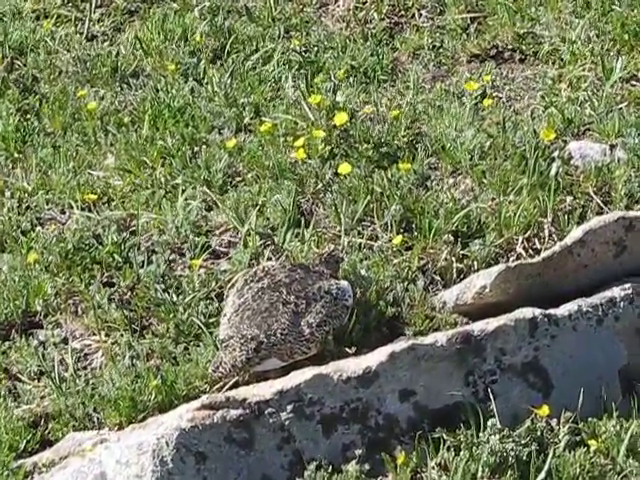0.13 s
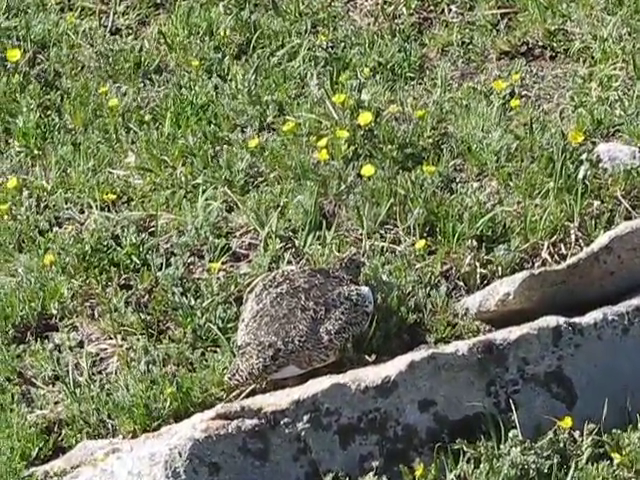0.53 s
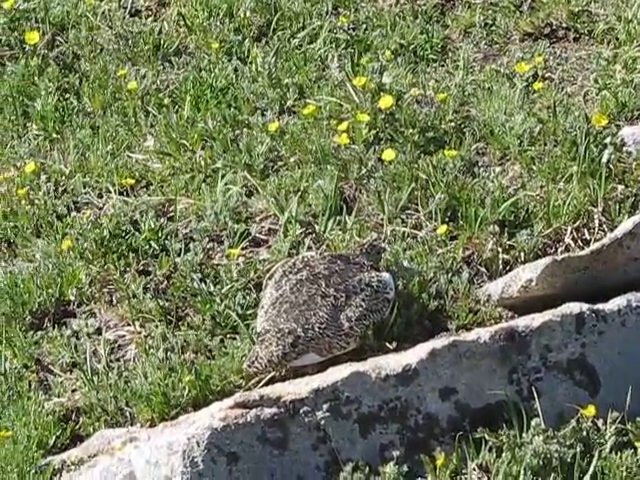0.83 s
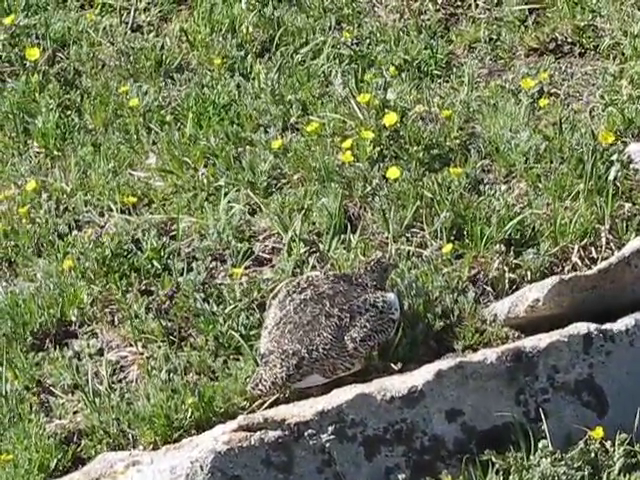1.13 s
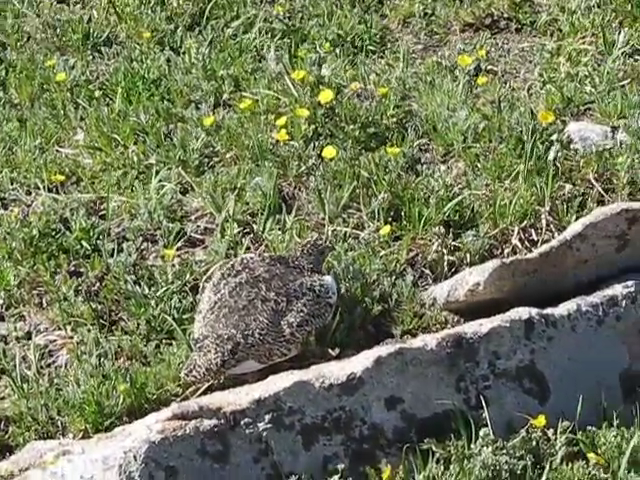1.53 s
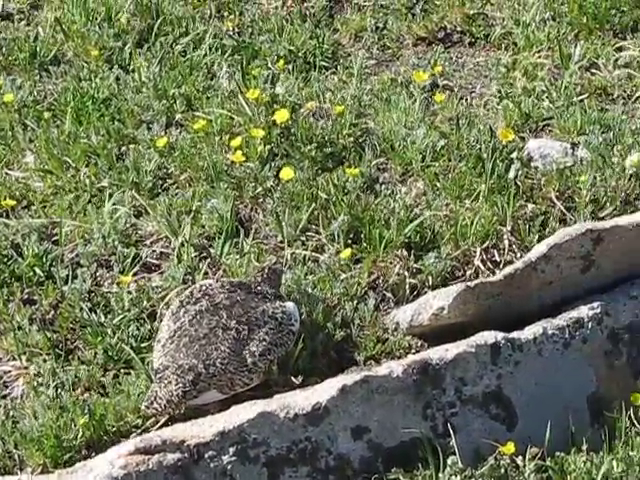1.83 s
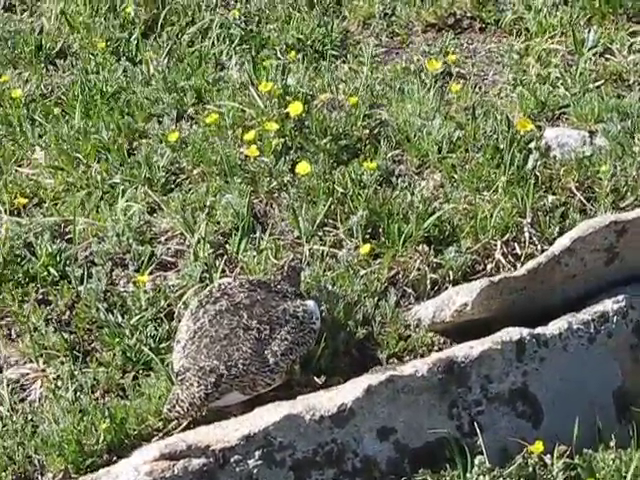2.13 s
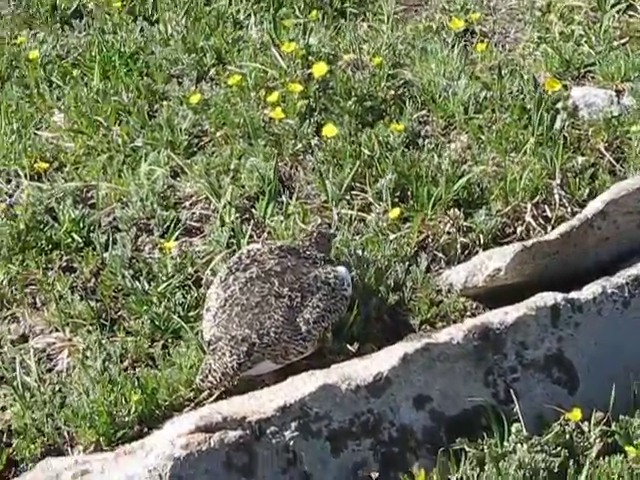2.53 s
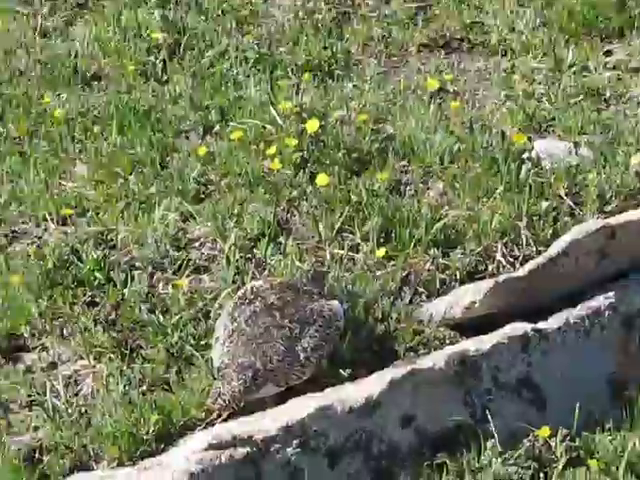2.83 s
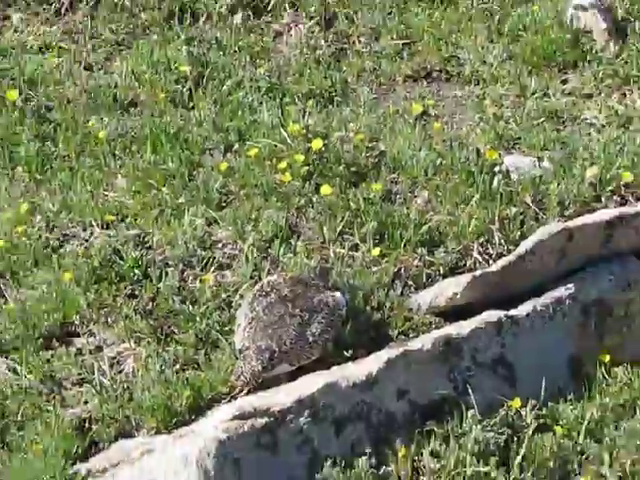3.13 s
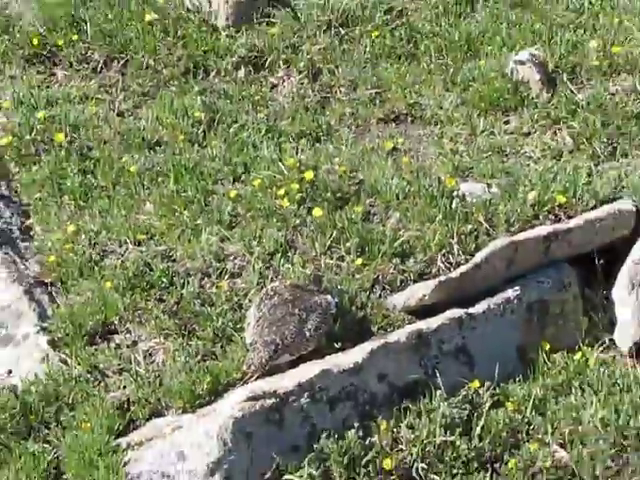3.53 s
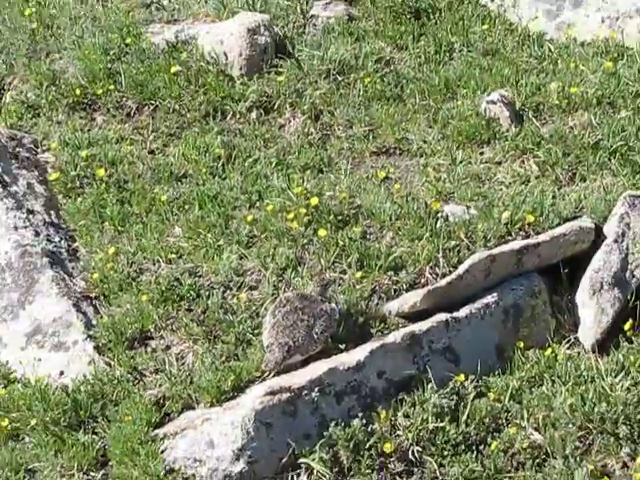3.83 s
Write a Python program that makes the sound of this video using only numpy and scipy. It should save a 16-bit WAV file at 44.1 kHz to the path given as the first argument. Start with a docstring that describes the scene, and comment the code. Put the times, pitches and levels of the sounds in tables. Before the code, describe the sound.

Ground bird croaks roughly twice, with three thin chick peeps and wind buffeting the microphone.

```python
"""Ptarmigan croaks on open tundra

A ptarmigan gives two short croaks: a harmonic series whose pitch and level pulse about sixty times a second.
Three thin rising peeps, probably a chick's, are gliding sines that crack near the end.
Gusts rumble on the microphone as filtered noise; struck modes make soft ticks and the click that ends
the first croak, and short noise bursts make snaps and a rustle.
Behind lie a steady noise hiss and the camera's faint pulsing sine whine."""
import sys
import numpy as np
from scipy import signal
from scipy.io import wavfile
from scipy.ndimage import uniform_filter1d

SR = 44100
rng = np.random.default_rng(int(sys.argv[2]) if len(sys.argv) > 2 else 0)


def dump(signal):
    """Clip the signal to [-1, 1] and save it as 16-bit WAV at the path in sys.argv[1]."""
    limited = np.clip(np.atleast_2d(signal).T, -1, 1)
    pcm = np.round(limited * 32767).astype(np.int16)
    wavfile.write(sys.argv[1], SR, pcm)


N = 176400
T = np.arange(N) / SR  # time [s]
CUTOFF_HZ = 15750

# Beating of each croak: (first beat [s], beat rate [1/s], slowing [1/s^2])
CROAK_BEATS = [(1.586, 61.9, 18), (3.7455, 62.4, 0)]
# Rise of pitch between beats, one value per croak: (leap [octaves])
CROAK_LEAPS = [.7, 0.61]
# Course of each croak: (time [s], pitch on the beat [Hz], level before the throat [dB])
CROAK_COURSES = [
    [(1.57, 705, -56), (1.603, 743, -40), (1.63, 846, -34), (1.70, 832, -33), (1.785, 766, -34.5),
     (1.805, 720, -37.5), (1.823, 666, -43.5), (1.845, 600, -62)],
    [(3.725, 749, -60), (3.745, 747, -42.5), (3.775, 760, -32.5), (3.81, 755, -31.5), (3.845, 813, -31),
     (3.92, 851, -26.5), (3.955, 798, -30.5), (4.0, 841, -31.5)],
]
# Resonance of throat and beak in each croak: (frequency [Hz], gain [dB])
THROAT_RESPONSES = [
    [(600, -3), (850, -4), (1250, 5), (1650, -4), (2100, -3), (2500, -0.5), (3200, -11.5), (3700, -24),
     (4200, -17), (5000, -29), (8000, -38), (14000, -36)],
    [(600, -8.5), (850, -5), (1200, 9), (1500, 1.5), (2000, 0), (2400, -2), (2900, -21), (3700, -26.5),
     (4350, -19.5), (5200, -36.5), (8000, -45), (14000, -43)],
]
# Beats that half fail: (time [s], level loss [dB], pitch rise [octaves])
WEAK_BEATS = [(1.685, 2.5, .12), (1.716, 2.5, 0.11), (3.824, 4, 0.072), (3.889, 9, 0.084),
              (3.969, 4.5, 0.053)]
# Stereo placing of the croaks: (frequency [Hz], left-right difference [dB])
CROAK_PAN = [(900, 1), (1600, -2.9), (2400, -5), (4500, -2)]
# Course of each peep: (time [s], pitch [Hz], level [dB])
PEEP_COURSES = [
    [(0.095, 3650, -67), (0.101, 4060, -45), (0.125, 4480, -32), (0.135, 5270, -29.5), (0.143, 5920, -42.5),
     (0.148, 5870, -54)],
    [(1.417, 3870, -53), (1.427, 4240, -38.5), (1.443, 4150, -41), (1.451, 4430, -29.5), (1.463, 5110, -30),
     (1.472, 5220, -51.5)],
    [(2.857, 3662, -53), (2.865, 3950, -37.5), (2.873, 4170, -39), (2.883, 4280, -30), (2.895, 4900, -25),
     (2.905, 5700, -30.5), (2.911, 5762, -48)],
]
# Soft ticks, and the low click that ends the first croak (1.81 s):
# (time [s], strength before the modes [dB], left-right difference [dB])
TICK_STRIKES = [(0.065, -45, 1), (0.132, -38.5, 3.5), (0.249, -47, 0), (0.814, -45, -4), (0.864, -51, -1.0),
                (0.907, -47, -1.0), (0.94, -43, -1), (0.974, -40, 1), (1.008, -39.5, -1.0), (1.035, -42, 3),
                (1.059, -42, 1), (1.1, -43, -0.5), (1.121, -40, 2), (1.153, -46, 4), (1.343, -40.5, -0.5),
                (1.369, -39.5, -3), (1.434, -40, 10), (1.81, -28.5, -2.5), (1.932, -41.5, 2),
                (1.995, -44, -2), (2.227, -46, -1.5), (2.454, -46, 15.5), (2.569, -42, 7), (2.592, -43, 4),
                (2.616, -52, 4), (2.659, -44.5, 1.5), (2.683, -37.5, 17), (2.771, -44.5, 13),
                (3.238, -43.5, 3)]
# Damped modes of the ticks: (frequency [Hz], relative gain [dB], time to fall 60 dB [s])
TICK_MODES = [(480, 2.5, 0.034), (760, 9, 0.013), (977, 9, 0.014), (1255, 10.5, 0.01), (1810, -9, 0.013),
              (2300, -15, 0.0073)]
# Strength of the finer patter, before the modes: (time [s], level [dB])
PATTER_LEVEL = [(0, -58.5), (.75, -55.5), (.9, -50), (1.15, -53), (1.42, -49), (1.55, -54), (2.45, -63),
                (2.66, -50), (2.85, -59), (3.2, -56), (3.45, -59.5), (4, -55)]
# Crisp snaps of dry stems: (time [s], strength before the noise [dB], left-right difference [dB])
STEM_SNAPS = [(.067, -44, -7), (.134, -41.5, -3), (.19, -50, -2), (.755, -62, 0), (1.298, -63, 3),
              (2.57, -40, -15)]
# Relative spectrum of the snaps: (frequency [Hz], density [dB per Hz])
SNAP_SPECTRUM = [(1000, -20), (3200, 8), (4500, 1), (7000, -13), (15000, -21)]
# Course of the brushing rustle, before its flicker: (time [s], level [dB])
RUSTLE_LEVEL = [(1.17, -77), (1.22, -49.5), (1.275, -51.5), (1.30, -41.5), (1.315, -50), (1.37, -54),
                (1.45, -75)]
# Relative spectrum of the rustle: (frequency [Hz], density [dB per Hz])
RUSTLE_SPECTRUM = [(300, 18.5), (1400, 8.5), (2500, 2), (5000, -2), (8000, -9), (13500, -1), (15500, -21)]
# Gusts on each microphone port, before flicker and brightening: (time [s], level [dB])
GUSTS_LEFT = [(0.0, -12), (0.12, -17.5), (0.18, -18.5), (0.23, -15.5), (0.38, -31), (0.67, -42.5),
              (0.8, -23), (0.94, -17), (0.98, -26.5), (1.12, -28), (1.28, -45.5), (1.45, -37), (1.49, -27),
              (1.59, -21.5), (1.93, -39), (1.99, -29), (2.09, -33.5), (2.32, -31.5), (2.38, -53),
              (2.42, -36), (2.48, -63), (3.09, -77), (3.53, -60), (3.71, -61), (3.77, -42.5), (4.0, -43.5)]
GUSTS_RIGHT = [(0.0, -14), (0.43, -33), (0.51, -26), (0.68, -37.5), (0.73, -22.5), (0.82, -27), (0.88, -17),
               (1.05, -32.5), (1.09, -22.5), (1.38, -26.5), (1.45, -4.5), (1.51, -20), (1.85, -25),
               (1.91, -22), (2.04, -32.5), (2.07, -17.5), (2.21, -22), (2.26, -37.5), (2.45, -45.5),
               (2.49, -58), (2.88, -91), (3.31, -52), (3.42, -42), (3.74, -50.5), (3.85, -40), (4.0, -54)]
# Relative rumble spectrum of each port at the reference gust: (frequency [Hz], density [dB per Hz])
RUMBLE_LEFT = [(20, -13.5), (35, -5.5), (65, 2), (120, 1), (170, -5), (250, -12), (380, -26.5), (600, -49),
               (1200, -69)]
RUMBLE_RIGHT = [(20, -5.5), (35, -1), (65, 2), (120, -0.5), (170, -13.5), (250, -35.5), (400, -47),
                (700, -67), (1200, -57)]
# Relative spectrum of the distant air: (frequency [Hz], density [dB per Hz])
AIR_SPECTRUM = [(50, 3.5), (120, 2), (300, -1.5), (700, -2.5), (1230, -5), (1700, -4.5), (2500, -7.5),
                (4500, -10), (8000, -14.5), (11000, -15.5), (15500, -24.5)]
# Course of the distant air: (time [s], level [dB])
AIR_LEVEL = [(0, -54.5), (.5, -55), (1.0, -52.5), (2.3, -53), (3.1, -52), (4.0, -52.5)]
# Likeness of the two channels of air: (frequency [Hz], left-right correlation [-1 to 1])
AIR_CORRELATION = [(100, 0.62), (400, 0.78), (1200, 0.23), (3000, 0.13), (7000, 0.073), (15000, 0.07)]
# Stereo placing of the air: (frequency [Hz], left-right difference [dB])
AIR_PAN = [(200, -1), (1200, -1), (4500, -1.6), (12000, 1)]

# Croak: irregularity as relative pitch, overtone level [dB] and relative amplitude
PITCH_JITTER, SHIMMER_DB, RASP = .022, 1.1, .1
BEAT_JITTER_S, WEAK_WIDTH_S = .0003, .006
# The pitch is lowest at this place in the beat, then leaps for a share of it
LOWEST_AT_BEATS, LEAP_SHARE, SLIDE_CURVE = .2, 0.28, 1.7
FUNDAMENTAL_LEAD_BEATS, SECOND_LAG_BEATS = 0.063, 0.048
FUNDAMENTAL_DIP_DB, OVERTONE_DIP_DB, SWELL_SHAPE = 12.5, 18, 1.27
# Below this course level the upper overtones weaken, in dB per dB
SOFT_BELOW_DB, SOFT_DULLING = -30.5, 0.64

PEEP_FADE_S, PEEP_OCTAVE_DB = 0.0082, -25
PEEP_PAN_DB, PEEP_RIGHT_LAG_S = 5.5, .000044
# Near the top the voice breaks; depth scales the random phase [rad] and relative amplitude
CRACK_BEFORE_END_S, CRACK_WIDTH_S, CRACK_DEPTH, CRACK_RATE_HZ = 0.0043, 0.0056, 0.48, 1000

TICK_DB, TICK_SPREAD_DB, PATTER_PER_S = -9, 3, 130
SNAP_DECAY_S = 0.0028  # time constant
RUSTLE_PAN_DB = 0.5
# Brightening is in dB per octave for each dB above the reference gust
WIND_REFERENCE_DB, WIND_BRIGHTENING, WIND_FLICKER_DB, WIND_DB = -14.5, 0.41, 3, 1
WHINE_HZ, WHINE_DB, WHINE_RIGHT_DB = 7868, -57.5, -15.5  # right is relative to left
WHINE_PERIOD_S, WHINE_CENTRE_S, WHINE_DUTY = 1 / 29.97, 3.031, 0.5


def croak(beating, leap_octaves, course, throat):
    """Resonance shapes a harmonic series whose pitch and overtone levels are modulated at the beat rate."""
    first_s, rate, slowing = beating
    beat_hz, level_db = in_time(course)
    gate = during(course, .005)
    on = gate > 0
    since = T - first_s + BEAT_JITTER_S * drift(19.2)
    beats = since * (rate - slowing * since / 2)
    octaves = leap_octaves * (pitch_lift(beats) - pitch_lift(0))
    for s, loss_db, weak_octaves in WEAK_BEATS:
        near = np.exp(-((T - s) / WEAK_WIDTH_S) ** 2)
        level_db = level_db - loss_db * near
        octaves = octaves + weak_octaves * near
    hz = (beat_hz * 2 ** octaves * (1 + PITCH_JITTER * drift(270)))[on]
    phase = 2 * np.pi * np.cumsum(hz) / SR
    softness_db = np.maximum(SOFT_BELOW_DB - level_db[on], 0)
    out = np.zeros((2, N))
    for k in range(1, 16):
        dip_db = FUNDAMENTAL_DIP_DB if k == 1 else OVERTONE_DIP_DB
        lead = {1: FUNDAMENTAL_LEAD_BEATS, 2: -SECOND_LAG_BEATS}.get(k, 0)
        # 0 on the beat, 1 midway between beats
        slack = np.abs(np.sin(np.pi * (beats[on] + lead))) ** (2 * SWELL_SHAPE)
        dull_db = SOFT_DULLING * softness_db * (k > 2)
        gain_db = at_hz(throat, k * hz) - dip_db * slack - dull_db + SHIMMER_DB * drift(220)[on]
        harmonic = np.sqrt(2) * from_db(gain_db) * np.sin(k * phase)
        out[:, on] += harmonic * panned(at_hz(CROAK_PAN, k * hz))
    return out * gate * from_db(level_db) * (1 + RASP * drift(620))


def pitch_lift(beats):
    """Frequency modulation, 0 to 1 over each beat: a quick leap, then a flattening slide."""
    after = (beats - LOWEST_AT_BEATS) % 1
    leap = np.sin(np.pi / 2 * after / LEAP_SHARE) ** 2
    slide = ((1 - after) / (1 - LEAP_SHARE)) ** SLIDE_CURVE
    return np.where(after < LEAP_SHARE, leap, slide)


def peep(course):
    """A gliding sine with a weak octave; random phase and amplitude modulation cracks it near the end."""
    hz, level_db = in_time(course)
    crack_s = course[-1][0] - CRACK_BEFORE_END_S
    crack = CRACK_DEPTH * np.exp(-((T - crack_s) / CRACK_WIDTH_S) ** 2)
    # A later arrival at the right sets the whistle to the left
    cycles = np.cumsum(hz) / SR - hz * np.array([[0], [PEEP_RIGHT_LAG_S]])
    phase = 2 * np.pi * cycles + crack * drift(CRACK_RATE_HZ)
    tone = np.sin(phase) + from_db(PEEP_OCTAVE_DB) * np.sin(2 * phase)
    tone = tone * (1 + crack * drift(CRACK_RATE_HZ)) * during(course, PEEP_FADE_S)
    tone = band_passed(tone, 4, [3200, 8300])
    return np.sqrt(2) * tone * from_db(level_db) * panned(PEEP_PAN_DB)


def ticks():
    """Modal synthesis: knocks, a croak's closing click and a finer patter excite well-damped modes."""
    patter = (rng.random(N) < PATTER_PER_S / SR) * from_db(in_time(PATTER_LEVEL)[0])
    strikes = kicks(TICK_STRIKES) + patter
    out = 0
    for hz, db, t60 in TICK_MODES:
        r = from_db(-60 / (t60 * SR))  # decay per sample
        w = 2 * np.pi * hz / SR
        strength = from_db(TICK_DB + db + TICK_SPREAD_DB * rng.standard_normal(N))
        strength = strength * rng.choice([-1, 1], N)
        mode = [1, -r * np.cos(w)], [1, -2 * r * np.cos(w), r * r]
        out = out + signal.lfilter(*mode, strikes * strength)
    return band_passed(out, 2, [250, 2600])


def snaps():
    """Exponential decay: bright noise bursts die within milliseconds."""
    decay = signal.lfilter([1], [1, -np.exp(-1 / (SNAP_DECAY_S * SR))], kicks(STEM_SNAPS))
    return decay * noise(SNAP_SPECTRUM, alike=0.24)


def rustle():
    """Random amplitude modulation of coloured noise, as something brushes briefly near the microphone."""
    level_db = in_time(RUSTLE_LEVEL)[0] + 2.2 * drift(56)
    envelope = from_db(level_db) * during(RUSTLE_LEVEL, .02)
    return envelope * noise(RUSTLE_SPECTRUM, alike=0.9) * panned(RUSTLE_PAN_DB)


def wind(gusts, spectrum):
    """Low-frequency noise on one microphone port, its spectrum tilting brighter as the gust grows."""
    level_db = in_time(gusts)[0] + WIND_FLICKER_DB * drift(19.3)
    force_db = level_db - WIND_REFERENCE_DB
    out = 0
    for hz, band in zip(*noise_bands(spectrum, [(1, 0.11)])):
        tilt_db = force_db * WIND_BRIGHTENING * np.log2(hz / 80)
        out = out + band[0] * from_db(WIND_DB + level_db + tilt_db)  # one channel per port
    return out


def air():
    """A diffuse field: steady hiss whose left-right correlation depends on frequency."""
    centres, bands = noise_bands(AIR_SPECTRUM, AIR_CORRELATION)
    hiss = sum(band * panned(at_hz(AIR_PAN, hz)) for hz, band in zip(centres, bands))
    return from_db(in_time(AIR_LEVEL)[0]) * hiss


def whine():
    """A gated sine: the camera's electronics whistle thirty times a second, mostly on the left."""
    off_centre = np.abs(((T - WHINE_CENTRE_S) / WHINE_PERIOD_S + .5) % 1 - .5)
    gate = uniform_filter1d(1.0 * (off_centre < WHINE_DUTY / 2), size=60)  # softened edges
    tone = np.sqrt(2) * gate * np.sin(2 * np.pi * WHINE_HZ * T)
    return tone * from_db([[WHINE_DB], [WHINE_DB + WHINE_RIGHT_DB]])


def from_db(db):
    """Gain is ten to the power of decibels over twenty."""
    return 10 ** (np.asarray(db) / 20)


def rms_one(x):
    """Dividing by the root mean square gives unit power."""
    return x / np.sqrt(np.mean(x ** 2) + 1e-20)


def in_time(rows):
    """Linear interpolation gives each column of a curve at every sample."""
    s, *columns = np.transpose(rows)
    return [np.interp(T, s, c) for c in columns]


def at_hz(points, hz):
    """A spectrum is interpolated along a logarithmic frequency axis."""
    points = np.array(points)
    return np.interp(np.log(hz), np.log(points[:, 0]), points[:, 1])


def during(rows, fade_s):
    """A gate is one while a curve lasts and fades linearly to zero outside it."""
    inside_s = np.minimum(T - rows[0][0], rows[-1][0] - T)
    return np.clip(1 + inside_s / fade_s, 0, 1)


def panned(db):
    """Constant-power panning: left and right gains from their level difference."""
    gains = from_db(np.atleast_1d(db) * np.array([[.5], [-.5]]))
    return gains / np.sqrt(np.mean(gains ** 2, axis=0))


def band_passed(x, order, edges_hz):
    """A Butterworth filter passes a band with a maximally flat response."""
    return signal.sosfilt(signal.butter(order, edges_hz, "band", fs=SR, output="sos"), x)


def drift(rate_hz):
    """White noise through a two-pole low-pass becomes a smooth random course of unit power."""
    r = np.exp(-2 * np.pi * rate_hz / SR)
    settled = signal.lfilter([1], [1, -2 * r, r * r], rng.standard_normal(N + SR))[SR:]
    return rms_one(settled)


def noise_bands(spectrum, likeness):
    """Mid and side noise sets the correlation of half-octave bands: (centres [Hz], bands of total power 1)."""
    low, high = spectrum[0][0], min(spectrum[-1][0], CUTOFF_HZ)
    edges = 20 * 2 ** (np.arange(21) / 2)
    white = rng.standard_normal((2, 2, N))  # neighbouring bands use different noise
    centres, bands = [], []
    for k, pair in enumerate(zip(edges, edges[1:])):
        if pair[1] > low and pair[0] < high:
            mid, side = band_passed(white[k % 2], 2, pair)
            hz = np.sqrt(pair[0] * pair[1])
            alike = np.clip(at_hz(likeness, hz), -1, 1)
            stereo = np.sqrt(1 + alike) * mid + np.sqrt(1 - alike) * side * [[1], [-1]]
            centres.append(hz)
            bands.append(from_db(at_hz(spectrum, hz)) * stereo)
    return centres, np.array(bands) / np.std(sum(bands))


def noise(spectrum, alike):
    """Summed bands give steady coloured stereo noise of unit power."""
    return noise_bands(spectrum, [(1, alike)])[1].sum(axis=0)


def kicks(rows):
    """An impulse excites all frequencies alike: one stereo impulse for each row."""
    out = np.zeros((2, N))
    for s, db, pan_db in rows:
        out[:, int(s * SR)] += from_db(db) * panned(pan_db)[:, 0]
    return out + 1e-18  # keeps decaying filters out of denormal numbers


def scene():
    """Superposition of birds in the open, wind and small noises at the microphone."""
    calls = zip(CROAK_BEATS, CROAK_LEAPS, CROAK_COURSES, THROAT_RESPONSES)
    birds = sum(croak(*call) for call in calls) + sum(peep(course) for course in PEEP_COURSES)
    rumble = np.array([wind(GUSTS_LEFT, RUMBLE_LEFT), wind(GUSTS_RIGHT, RUMBLE_RIGHT)])
    return birds + ticks() + snaps() + rustle() + rumble + air() + whine()


def record(dry):
    """Band limitation: the recorder's steep elliptic low-pass cuts the top."""
    return signal.sosfilt(signal.ellip(10, .1, 80, CUTOFF_HZ, fs=SR, output="sos"), dry)


dry = scene()
out = record(dry)
dump(out)
```